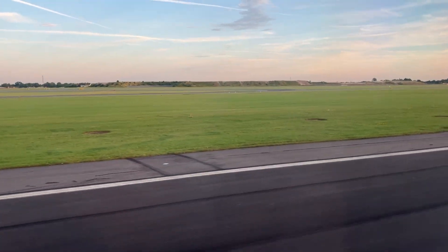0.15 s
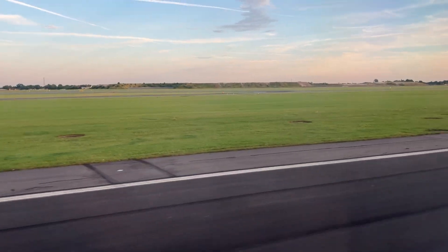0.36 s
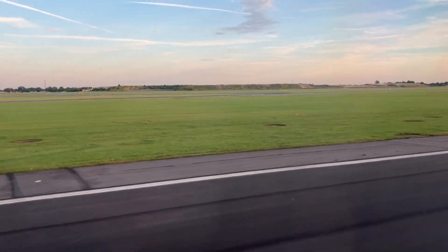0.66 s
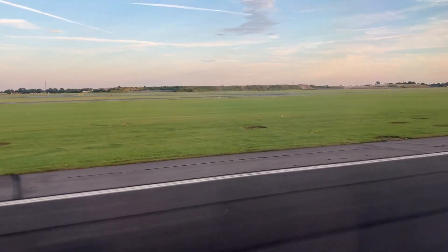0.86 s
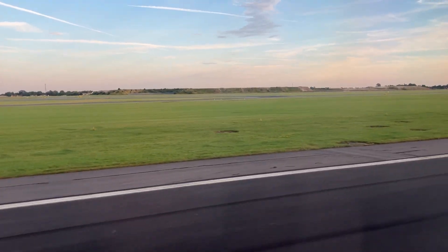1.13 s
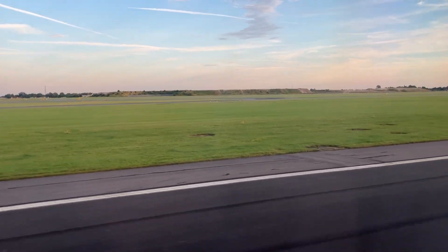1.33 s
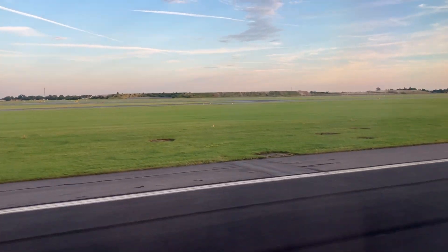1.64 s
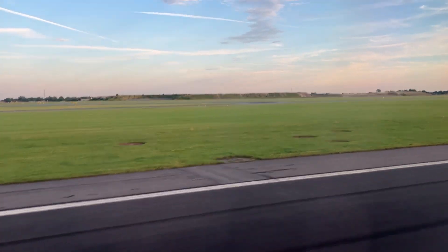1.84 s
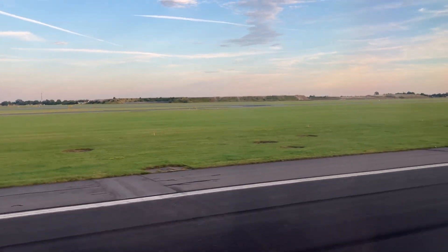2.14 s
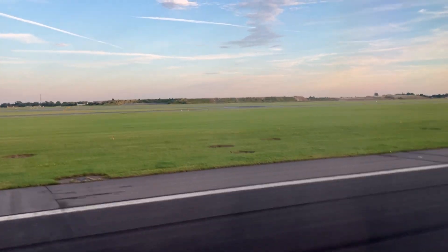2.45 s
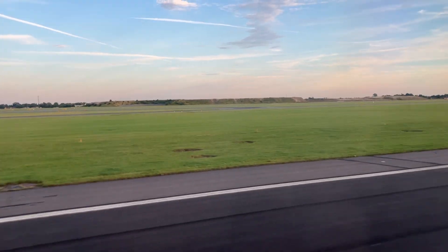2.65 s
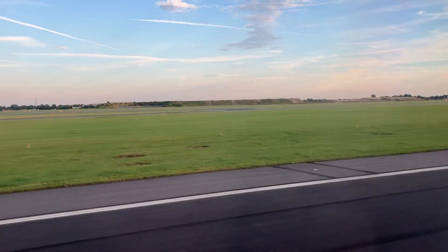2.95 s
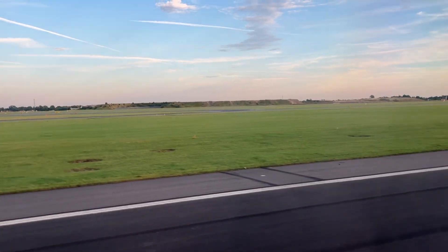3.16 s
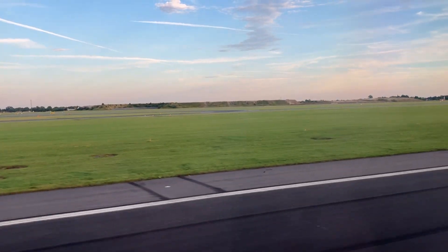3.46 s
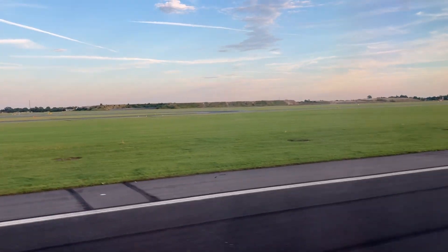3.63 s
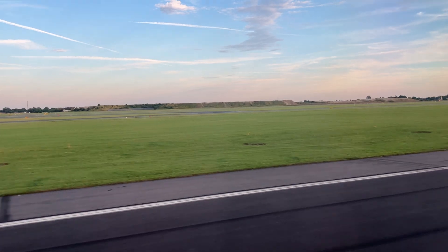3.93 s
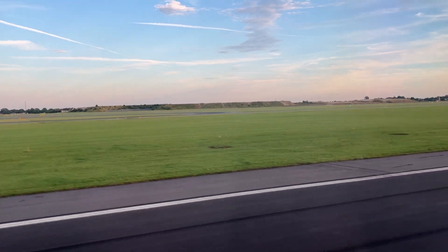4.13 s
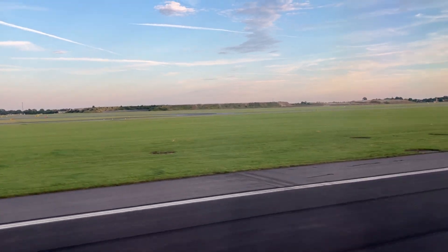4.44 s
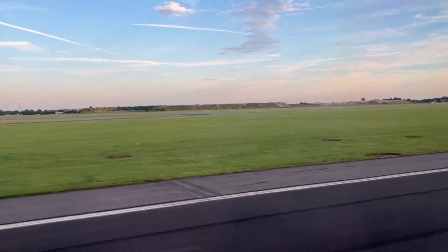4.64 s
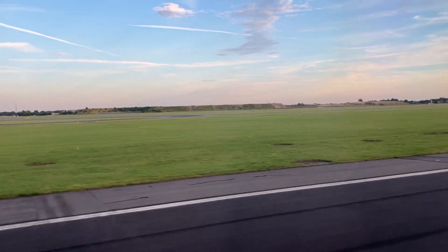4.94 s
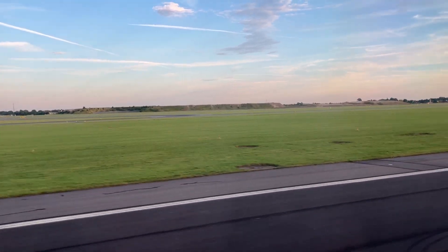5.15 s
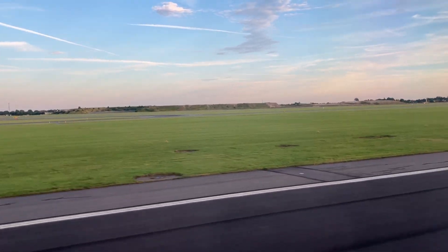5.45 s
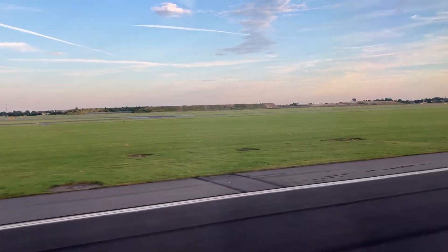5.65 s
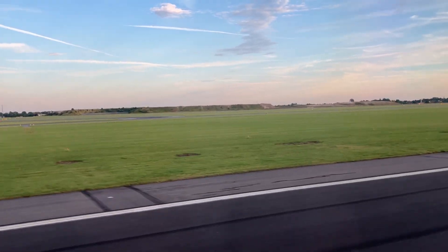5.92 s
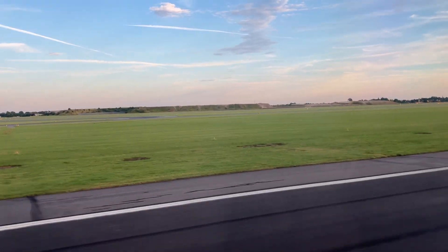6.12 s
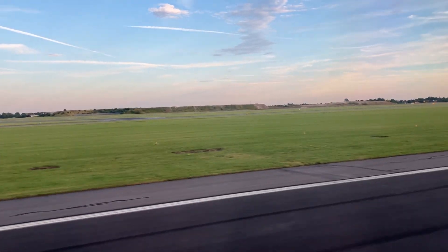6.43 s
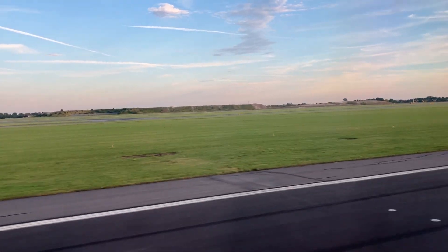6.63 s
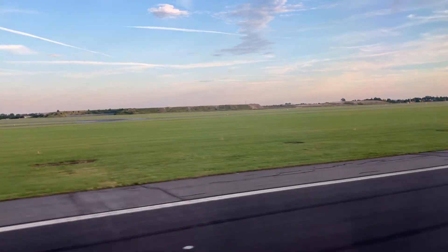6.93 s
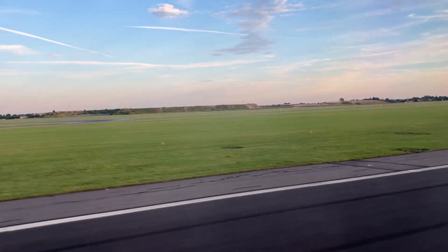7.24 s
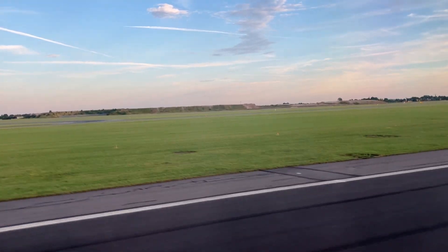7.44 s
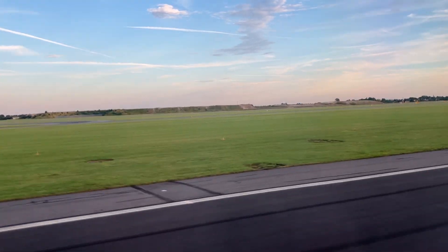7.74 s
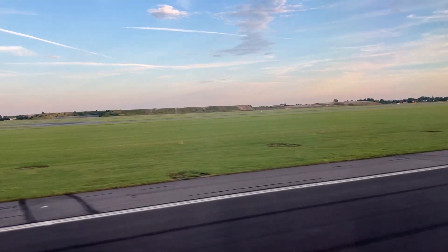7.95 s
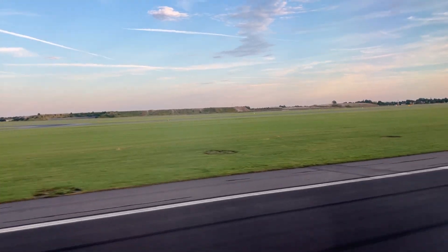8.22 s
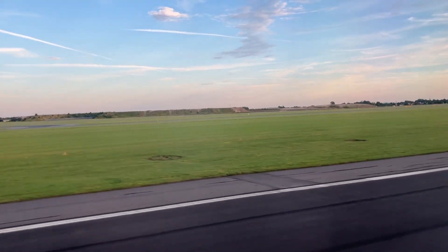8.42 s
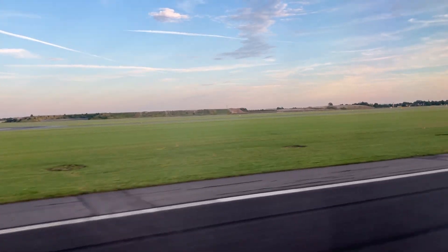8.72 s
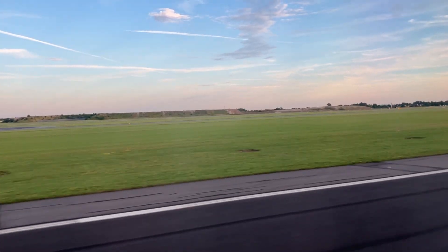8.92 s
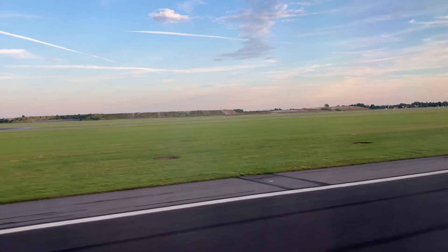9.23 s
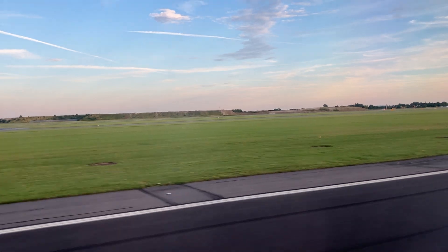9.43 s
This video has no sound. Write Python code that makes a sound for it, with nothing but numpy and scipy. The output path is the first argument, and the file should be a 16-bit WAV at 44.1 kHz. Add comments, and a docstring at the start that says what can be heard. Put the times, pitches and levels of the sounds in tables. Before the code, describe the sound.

Continuous, bass-heavy cabin rumble at takeoff, picked up in stereo by a small microphone at a window seat. Muffled engine roar and thick floor vibration ease after the first second, then stay steady. Two engine tones waver against each other as they rise a little and settle. Low bumps cluster in the middle, with small plastic ticks, squeaks and faint air hiss above, and a dull knock at the end.

```python
"""Airliner cabin on the takeoff roll: the floor booms and jet roar comes through the wall, both resonant noise.
Two fans spool up as sine blade tones with harmonics, and the two tones beat.
Trim ticks, rustles and squeaks, air vents hiss, rough noise buzzes early on, and one knock comes through the floor.
Two ports hear it with level and phase differences; a look-ahead limiter holds down loud booms."""
import sys
import numpy as np
from scipy import signal
from scipy.fft import rfft, irfft, next_fast_len
from scipy.io import wavfile
from scipy.ndimage import uniform_filter1d, minimum_filter1d

SR = 44100
rng = np.random.default_rng(int(sys.argv[2]) if len(sys.argv) > 2 else 0)


def generate_wav(signal):
    """Clip the signal to [-1, 1] and save it as 16-bit WAV at the path in sys.argv[1]."""
    frames = np.transpose(np.atleast_2d(signal))
    scaled = np.clip(frames, -1, 1) * 32767
    pcm = np.round(scaled).astype(np.int16)
    wavfile.write(sys.argv[1], SR, pcm)


N = 422478


def amp(db):
    """dB to gain."""
    return 10 ** (np.asarray(db) / 20)


def rms_one(x):
    """Scale to rms 1."""
    return x / np.sqrt(np.mean(x ** 2) + 1e-20)


def seconds():
    """Time of each sample [s]."""
    return np.arange(N) / SR


def in_time(rows):
    """Columns of a curve table, sample by sample."""
    time_s, *columns = np.transpose(rows)
    return [np.interp(seconds(), time_s, column) for column in columns]


def at_hz(rows, hz):
    """Columns of a spectrum table, interpolated over log frequency."""
    table_hz, *columns = np.transpose(rows)
    return [np.interp(np.log(hz), np.log(table_hz), column) for column in columns]


def drift(corner_hz):
    """Slow random curve of spread 1: white noise through two equal poles at 1/40 of the sample rate."""
    pole = np.exp(-2 * np.pi * corner_hz * 40 / SR)
    white = rng.standard_normal(N // 40 + 2002)
    slow = signal.lfilter([1], [1, -2 * pole, pole ** 2], white)[2000:]
    return np.interp(np.arange(N) / 40, np.arange(len(slow)), rms_one(slow - slow.mean()))


# noise between the ports: (frequency [Hz], likeness [0-1], right leads [ms], left minus right [dB])
PORT_PAIR = [(40, .997, -.08, -.3), (90, .97, -.35, .3), (250, .87, -.13, -.7), (450, .75, .21, .5),
             (650, .3, .3, 1.5), (950, .65, .33, 0), (1500, .6, .318, 3), (2200, .1, .3, 1.2),
             (3400, .35, .29, .5), (5500, .2, .3, -2), (6700, .5, .298, 0), (9000, .85, .278, 0),
             (11400, .85, .263, 0), (15800, .85, .253, .3)]


def coloured(gain_at):
    """Two-port noise, rms 1: the right hears a time-shifted copy of the left plus noise of its own."""
    size = next_fast_len(N)
    hz = np.maximum(np.arange(size // 2 + 1) * SR / size, 1)
    likeness, lead_ms, pan_db = at_hz(PORT_PAIR, hz)
    left, own = rfft(rng.standard_normal((2, size)))
    shared = likeness * left * np.exp(2j * np.pi * hz * lead_ms / 1000)
    right = shared + np.sqrt(1 - likeness ** 2) * own
    ports = np.array([left * amp(pan_db / 2), right * amp(-pan_db / 2)])
    return rms_one(irfft(gain_at(hz) * ports, size)[:, :N])


def shape(spectrum, modes=()):
    """Gain over frequency: a smooth spectrum lifted at each resonance."""
    def gain_at(hz):
        lift_db = sum(db / (1 + (2 * (hz - centre_hz) / width_hz) ** 2) for centre_hz, width_hz, db in modes)
        return amp(at_hz(spectrum, hz)[0] + lift_db)
    return gain_at


# vent hiss: (time [s], level [dB])
HISS_LEVEL = [(0, -50), (.8, -55.5), (2.5, -57.5), (5, -60), (8, -60.5), (9.58, -61)]
# (frequency [Hz], relative level [dB per Hz])
HISS_SPECTRUM = [(1200, -28.5), (2400, -1), (3200, -2.5), (5700, -12), (7500, -5), (8300, -4),
                 (9200, -20.5), (10000, -7.5), (11300, -11.5), (12700, -16), (13700, -29.5), (15200, -18.5)]


def hiss():
    """Vent hiss: shaped noise, wavering slightly."""
    return amp(in_time(HISS_LEVEL)[0] + 0.98 * drift(20)) * coloured(shape(HISS_SPECTRUM))


# short squeaks of the trim: (time of top [s], peak [dB], frequency [Hz])
SQUEAK_EVENTS = [(2.311, -54, 3350), (2.553, -57, 3300), (3.482, -57, 4200), (3.502, -54, 4380),
                 (3.657, -49, 2300), (4.835, -56, 3350)]
SQUEAK_HALF_S = .01


def squeaks():
    """Trim squeaks: brief high sines under Gaussian envelopes, alike at both ports."""
    out = np.zeros(N)
    for top_s, db, hz in SQUEAK_EVENTS:
        since = seconds() - top_s
        out += amp(db) * np.exp(-(since / SQUEAK_HALF_S) ** 2) * np.sin(2 * np.pi * hz * since)
    return out


# dull rustle: (frequency [Hz], relative level [dB per Hz])
DULL_SPECTRUM = [(500, -10.5), (900, 7.5), (2300, -4.5), (4500, -15), (8000, -22.5), (15600, -35.5)]
KNOCKS_PER_S, KNOCK_CYCLES = 500, 30   # cycles for a ring to fall 60 dB


def knocks():
    """Loose parts: uneven clicks dealt to small panel resonances, 13 samples early at the right port."""
    strength_db = 4 * np.minimum(rng.exponential(1, N), 3)
    clicks = (rng.random(N) < KNOCKS_PER_S / SR) * amp(strength_db)
    pitches_hz = np.geomspace(950, 4600, 14)
    dealt, out = rng.integers(0, 14, N), np.zeros(N)
    for k, hz in enumerate(pitches_hz):
        pole, step_rad = amp(-60 * hz / (KNOCK_CYCLES * SR)), 2 * np.pi * hz / SR
        gain = amp(at_hz(DULL_SPECTRUM, hz)[0]) * hz / pitches_hz[0]
        struck = clicks * (dealt == k) + 1e-18
        resonator = [0, np.sin(step_rad)], [1, -2 * pole * np.cos(step_rad), pole ** 2]
        out += gain * signal.lfilter(*resonator, struck)
    return rms_one(np.array([np.roll(out, 13), out]))


# swells: (time of top [s], level before the dull/bright gains [dB], rise [s], fall [s], dullness [0-1])
RUSTLE_EVENTS = [(.55, -52.5, 0.059, 0.14, 0.86), (2.31, -45.5, .045, 0.057, 0.7),
                 (2.73, -50.5, .02, 0.041, 0.5), (3.70, -46, 0.11, 0.11, 0.47),
                 (4.95, -50, 0.049, 0.07, 0.8), (6.45, -51, 0.017, .03, 0.73), (9.43, -58, 0.023, .03, 0.3)]
# bright rustle: (frequency [Hz], relative level [dB per Hz])
BRIGHT_SPECTRUM = [(2500, -25.5), (4000, -1.5), (7500, -6.5), (9200, -13), (11300, -3.5), (13700, -17),
                   (15600, -13)]
KNOCK_DB, DULL_GAIN_DB = -8, 9.5   # knocks relative to the dull noise; gain of both


def rustles():
    """Swells as the cabin shakes: dull noise with panel knocks, plus bright noise."""
    t, dull, bright = seconds(), np.zeros(N), np.zeros(N)
    for top_s, db, rise_s, fall_s, dullness in RUSTLE_EVENTS:
        swell = amp(db) * np.exp(-((t - top_s) / np.where(t < top_s, rise_s, fall_s)) ** 2)
        dull += swell * np.clip(dullness, 0, 1)
        bright += swell * np.clip(1 - dullness, 0, 1)
    dull_noise = coloured(shape(DULL_SPECTRUM)) + amp(KNOCK_DB) * knocks()
    bright_noise = amp(1.5 * drift(40)) * coloured(shape(BRIGHT_SPECTRUM))
    return amp(DULL_GAIN_DB) * dull * dull_noise + bright * bright_noise


# ticks: (time [s], rattle level before tail and ring [dB], thinness [0-1], length [s], ring [Hz])
TICK_EVENTS = [(1.0785, -42, 0.4, 0.011, 7600), (1.081, -46, 0.1, 0.0056, 2350),
               (1.388, -54, 0.3, .012, 5000), (1.583, -45, 0.64, .004, 7300), (1.897, -55, 0.6, .008, 7000),
               (2.0956, -49, .6, .006, 7500), (2.113, -49, 0.5, .013, 7000), (2.135, -41, 0.53, .007, 7550),
               (2.235, -51, .4, .008, 4200), (2.278, -54, .5, .005, 5000), (2.333, -50, .02, .004, 2000),
               (4.3056, -59, 0.5, .008, 11000), (4.423, -61, 0.3, .008, 11000),
               (4.909, -53, 0.3, .004, 7300), (4.945, -49, .05, .008, 2000),
               (6.7445, -52, 0.55, .005, 11000), (8.736, -55, 0.26, .01, 11000),
               (8.949, -42, 0.6, 0.012, 5500)]
# full and thin rattle: (frequency [Hz], relative level [dB per Hz])
FULL_TICK_SPECTRUM = [(880, -10), (1500, 0.5), (2400, 4), (2950, 0.5), (6660, -5.5), (7640, -6.5),
                      (8940, -9.5), (10800, -18), (15600, -28.5)]
THIN_TICK_SPECTRUM = [(4000, -35), (9000, -5.5), (11000, -0.5), (13000, -6.5), (15600, -0.5)]
TICK_ATTACK_S, TICK_TAIL_DB, TICK_TAIL_S = 0.0004, -8, .03
TICK_RING_DB, TICK_RING_Q = 9.5, 6.2


def ticks():
    """Trim ticks: a sudden, held noise burst with trailing chatter, which makes its own panel ring."""
    out, t = np.zeros((2, N)), np.arange(SR // 8) / SR
    full, thin = coloured(shape(FULL_TICK_SPECTRUM)), coloured(shape(THIN_TICK_SPECTRUM))
    chatter_db = 4 * drift(150)
    for start_s, db, thinness, length_s, ring_hz in TICK_EVENTS:
        start, thinness = round(start_s * SR), np.clip(thinness, 0, 1)
        span = slice(start, start + len(t))
        held = 1 / (1 + (t / length_s) ** 7.1)
        tail = amp(TICK_TAIL_DB + chatter_db[span]) * np.exp(-t / TICK_TAIL_S)
        burst = amp(db) * np.minimum(t / TICK_ATTACK_S, 1) * (held + tail)
        rattle = burst * ((1 - thinness) * full[:, span] + thinness * thin[:, span])
        ring = signal.lfilter(*signal.iirpeak(ring_hz, TICK_RING_Q, SR), rattle)
        out[:, span] += rattle + amp(TICK_RING_DB) * ring
    return out


# floor panel modes: (frequency [Hz], level relative to THUD_DB [dB])
FLOOR_PANEL_MODES = [(191, -3.5), (300, -21), (467, -20), (600, -26), (720, -27), (890, -35), (1010, -38)]
THUD_START_S, THUD_DB, THUD_RISE_S = 9.5322, 2.5, 0.0105   # rise of the lowest mode
THUD_QUICKENS = .3   # envelope speed goes as this power of mode frequency


def thud():
    """Soft knock through the floor: panel modes swell and die within a few cycles, high modes first."""
    after, out = np.maximum(seconds() - THUD_START_S, 0), np.zeros(N)
    for hz, mode_db in FLOOR_PANEL_MODES:
        age = after / THUD_RISE_S * (hz / FLOOR_PANEL_MODES[0][0]) ** THUD_QUICKENS
        envelope = (age * np.exp(1 - age)) ** 2
        out += amp(THUD_DB + mode_db) * envelope * np.sin(2 * np.pi * hz * after)
    return out


# rough buzz before spool-up: (time [s], level [dB])
BUZZ_LEVEL = [(0, -29), (.25, -43), (.32, -30), (.6, -32.5), (.72, -40), (.9, -55), (1.1, -90)]
# (frequency [Hz], relative level [dB per Hz])
BUZZ_SPECTRUM = [(300, -70.5), (500, -22.5), (700, 0), (1100, -8.5), (1400, -28), (2500, -79.5)]
# panel modes: (frequency [Hz], width [Hz], lift [dB])
BUZZ_PANEL_MODES = [(730, 30, 4.3), (775, 50, 5), (833, 15, 20), (1090, 70, 8.9)]


def buzz():
    """Noise in the panel modes near the blade tone, coming in uneven lumps."""
    lumps_db = 2.5 * drift(10)
    return amp(in_time(BUZZ_LEVEL)[0] + lumps_db) * coloured(shape(BUZZ_SPECTRUM, BUZZ_PANEL_MODES))


# near fan spools up, its governor hunts once and settles: (time [s], blade tone [Hz])
NEAR_BLADE_HZ = [(0, 833.3), (.45, 834.8), (.85, 841.3), (2.0, 871.8), (2.6, 881.6), (3.3, 891.4),
                 (3.95, 896.4), (4.4, 895.8), (4.8, 893.9), (5.6, 899.3), (6.2, 897.1), (9.58, 896.8)]
# far fan runs a little faster: (time [s], blade-tone turns gained on the near fan [turns])
FAR_TURNS_GAINED = [(-.25, -1), (.62, 2), (1.47, 4), (1.82, 5), (2.94, 9), (3.31, 10), (3.8, 12),
                    (4.42, 14), (5.3, 18), (5.75, 19), (6.11, 20), (6.67, 22), (8.02, 25), (8.33, 26),
                    (8.52, 27), (9.86, 31)]
# (time [s], near blade tone [dB rms], far blade tone [dB rms], near 2nd harmonic [dB rms])
TONE_LEVELS = [(0, -42, -38.5, -46.5), (.62, -43, -42.5, -49), (.8, -41.5, -47.5, -65),
               (1.2, -35.5, -56, -59), (1.8, -35.5, -45, -56), (2.45, -34.5, -44, -58.5),
               (3.1, -41, -45.5, -50), (4.2, -43, -44, -51), (5.0, -44, -45.5, -54.5),
               (5.8, -49.5, -48, -52.5), (6.7, -45, -45, -53.5), (8.0, -46.5, -50, -58),
               (9.58, -54.5, -44.5, -54)]
# near blade tone: (time [s], left minus right [dB])
NEAR_TONE_PAN = [(.3, -5), (.8, 0), (5.2, 0), (7, -10), (9, -5)]
# near fan: (time [s], 3rd [dB rms], 4th [dB rms], 5th [dB rms], 7th harmonic [dB rms])
HARMONIC_LEVELS = [(0, -53, -54, -67, -85), (.6, -58.5, -63, -69, -88), (.85, -71, -66.5, -68, -76),
                   (1.4, -71, -73, -73, -79), (1.8, -68, -73, -65, -84), (2.3, -69, -71.5, -70, -77),
                   (3.0, -72, -67.5, -74, -82.5), (3.7, -71, -81, -70.5, -76),
                   (4.5, -70, -74.5, -75.5, -71), (5.4, -72, -73.5, -78.5, -81),
                   (6.4, -72.5, -70, -72.5, -77.5), (7.3, -73, -74.5, -76, -74.5),
                   (8.3, -71, -72, -69.5, -80), (9.58, -74.5, -80, -73, -81)]
# (multiple, mean right lead [rad], left minus right at lowest speed [dB])
HARMONIC_SIDES = [(3, 0, 5), (4, .3, 2), (5, .6, 1), (7, -1, -2)]
# faint: (multiple, level at lowest speed [dB rms], level at top speed [dB rms], right lead [rad])
FAINT_HARMONICS = [(6, -78, -78.5, 2.1), (8, -77, -82.5, .3)]
# right port's phase lead; the near one settles at this fraction of spool-up
NEAR_LEAD_IDLE_RAD, NEAR_LEAD_FULL_RAD, LEAD_SETTLES_AT = -2.3, -4.2, .6
FAR_LEAD_RAD, SECOND_LEAD_RAD = 1.0, .2
LEAD_WANDER_RAD, SECOND_JITTER_RAD = .8, .6
IDLE_FLUTTER_DB, FAINT_WAVER_DB = 2.8, 1


def fans():
    """Blade tones and harmonics of both fans; phase differs per port, so beats differ left and right."""
    hz = uniform_filter1d(in_time(NEAR_BLADE_HZ)[0], size=SR // 4, mode="nearest")   # rotor inertia
    near_db, far_db, second_db = in_time(TONE_LEVELS)
    spool = (hz - hz.min()) / np.ptp(hz)   # 0 at lowest speed, 1 at top
    side = np.array([[-.5], [.5]])   # left, right
    near = 2 * np.pi * np.cumsum(hz) / SR
    far = near + 2 * np.pi * in_time(FAR_TURNS_GAINED)[0]
    idle_db = IDLE_FLUTTER_DB * (1 - spool) ** 2 * drift(13)   # tones break up together at low speed

    def flutter(depth_db):
        """Level flutter from turbulence, apart at each port, plus the common idle flutter."""
        return idle_db + depth_db * np.array([drift(30), drift(31)])

    settled = np.minimum(spool / LEAD_SETTLES_AT, 1)
    near_lead = NEAR_LEAD_IDLE_RAD + settled * (NEAR_LEAD_FULL_RAD - NEAR_LEAD_IDLE_RAD)
    near_gain = amp(near_db + 1.2 * drift(8) + idle_db - in_time(NEAR_TONE_PAN)[0] * side)
    out = near_gain * np.sin(near + near_lead * side)

    far_gain = amp(far_db + 1.5 * drift(8) + idle_db - 1.5 * side)
    out += far_gain * np.sin(far + FAR_LEAD_RAD * side)

    second_phase = 2 * near + SECOND_JITTER_RAD * drift(9.2) + SECOND_LEAD_RAD * side
    out += amp(second_db + flutter(3.2) - 1.4 * side) * np.sin(second_phase)

    for (k, lead, pan_db), db in zip(HARMONIC_SIDES, in_time(HARMONIC_LEVELS)):
        gain = amp(db + flutter(3.1) - pan_db * (1 - spool) * side)
        out += gain * np.sin(k * near + (lead + LEAD_WANDER_RAD * drift(.8)) * side)
    for k, idle_level_db, full_level_db, lead in FAINT_HARMONICS:
        level_db = idle_level_db + spool * (full_level_db - idle_level_db)
        gain = amp(level_db + flutter(3.5) + FAINT_WAVER_DB * drift(1))
        out += gain * np.sin(k * near + lead * side)
    return np.sqrt(2) * out   # sine rms to peak


# jet noise through the wall: (time [s], low roar [dB], rush [dB])
JET_LEVELS = [(0.05, -8, -24), (0.44, -12.5, -26.5), (0.73, -15.5, -31), (1.05, -14, -30), (2.81, -16, -32),
              (7.79, -16, -34), (8.86, -17.5, -35), (9.5, -16, -34)]
# (frequency [Hz], relative level [dB per Hz])
ROAR_SPECTRUM = [(40, -23.5), (75, -4.5), (100, -1.5), (125, -7.5), (200, -8), (300, -7), (380, -19.5),
                 (500, -29.5), (700, -65), (1500, -110)]
# cabin resonances: (frequency [Hz], width [Hz], lift [dB])
CABIN_MODES = [(83.4, 17.7, 8.5), (160, 24, 4), (217.6, 36, 5.5), (264.2, 22.5, 11), (356.3, 31, 5.5)]
# (frequency [Hz], relative level [dB per Hz])
RUSH_SPECTRUM = [(250, -2), (400, 18), (600, 11.5), (850, 8), (1000, 3), (1500, -3.5), (2100, -4.5),
                 (2800, -19), (4500, -18.5), (7000, -29.5), (10000, -70.5)]
# wall panel resonances: (frequency [Hz], width [Hz], lift [dB])
WALL_MODES = [(459, 21, 11.5), (528.4, 41, 4.5)]


def jet():
    """Low roar through cabin resonances and brighter rush through wall panels, both faintly gusting."""
    roar_db, rush_db = in_time(JET_LEVELS)
    roar = amp(roar_db + .5 * drift(7.5)) * coloured(shape(ROAR_SPECTRUM, CABIN_MODES))
    rush = amp(rush_db + .4 * drift(8)) * coloured(shape(RUSH_SPECTRUM, WALL_MODES))
    return roar + rush


# slow level of the floor noise: (time [s], level [dB])
BOOM_LEVEL = [(0, -4), (1.0, -14), (2.3, -9.5), (3.3, -12.5), (4.5, -13), (5.3, -14.5), (6.0, -14),
              (6.6, -14.5), (8.3, -14.5), (9.58, -15)]
# floor rings as wheels cross bumps: (time of top [s], peak [dB])
BUMP_SURGES = [(1.408, -4.5), (2.301, -8.5), (2.499, -27), (3.71, -4.5), (4.335, -3), (4.434, -7.5),
               (4.595, -2.5), (4.705, -5), (4.94, -2), (5.599, -5), (5.868, -7), (6.05, -4.5), (6.37, -9),
               (8.392, -7)]
BOOM_HZ, BOOM_WIDTH_HZ = 51.7, 29.8
SURGE_HZ, SURGE_HALF_S = 60.1, 0.047   # mean pitch; Gaussian half length
LULL_AFTER_S, LULL_HALF_S, LULL_DB = 0.039, 0.037, -4   # noise dip after each surge


def boom(steadiness=0.23):
    """Noise in the floor resonance, partly evened out; the floor rings clear for a few cycles per surge."""
    def resonance(hz):
        return (hz / BOOM_HZ) ** 1.43 / (1 + (2 * (hz - BOOM_HZ) / BOOM_WIDTH_HZ) ** 2) ** 1.117

    band = signal.butter(4, [32, 200], "band", fs=SR, output="sos")
    noise = signal.sosfilt(band, coloured(resonance))
    swell = np.sqrt(uniform_filter1d(np.mean(noise ** 2, axis=0), size=SR // 20) + 0.018)
    t, level_db, rings = seconds(), in_time(BOOM_LEVEL)[0], np.zeros(N)
    for top_s, db in BUMP_SURGES:
        detune, turn = rng.standard_normal(2)
        since = t - top_s
        level_db = level_db + LULL_DB * np.exp(-((since - LULL_AFTER_S) / LULL_HALF_S) ** 2)
        ring = np.sin(2 * np.pi * (SURGE_HZ * (1 + 0.015 * detune) * since + turn))
        rings += amp(db) * np.exp(-(since / SURGE_HALF_S) ** 2) * ring
    return amp(level_db) * rms_one(noise / swell ** steadiness) + rings


def scene():
    """All sources at the two ports."""
    background = hiss() + squeaks() + rustles() + ticks() + thud()
    return background + buzz() + fans() + jet() + boom()


LIMIT_DB, RELEASE_DB_PER_S, CUTOFF_HZ = -.65, 82, 15750


def record(dry):
    """Look-ahead limiter with linear dB release and smoothed gain, then a steep low-pass."""
    peak_db = 20 * np.log10(np.abs(dry).max(axis=0) + 1e-9)
    over_db = np.maximum(peak_db - LIMIT_DB, 0)
    ramp_db = RELEASE_DB_PER_S * seconds()
    held_db = np.maximum.accumulate(over_db + ramp_db) - ramp_db
    cut_db = -minimum_filter1d(-held_db, size=601)
    for _ in range(3):   # round the attack to a few ms
        cut_db = uniform_filter1d(cut_db, size=200)
    low_pass = signal.ellip(10, .3, 70, CUTOFF_HZ, fs=SR, output="sos")
    return signal.sosfilt(low_pass, dry * amp(-cut_db))


dry = scene()
out = record(dry)
generate_wav(out)
```